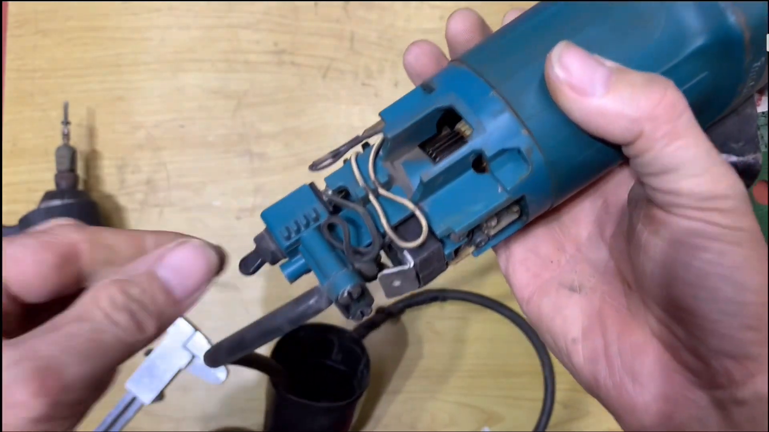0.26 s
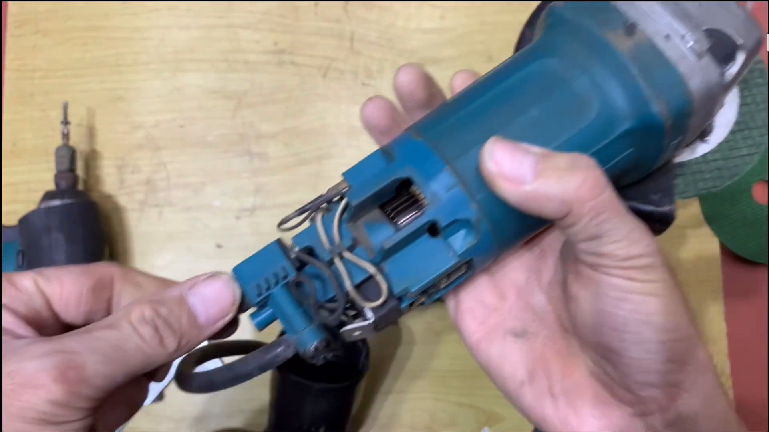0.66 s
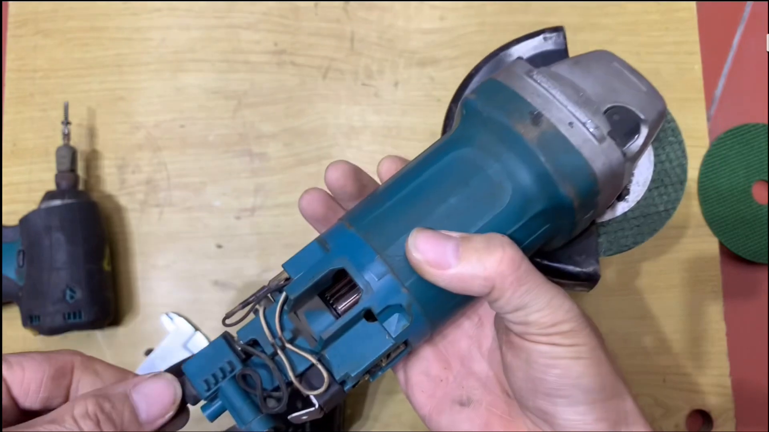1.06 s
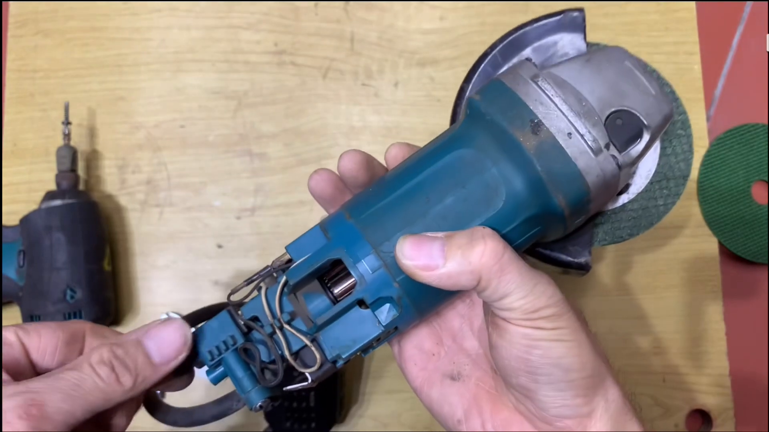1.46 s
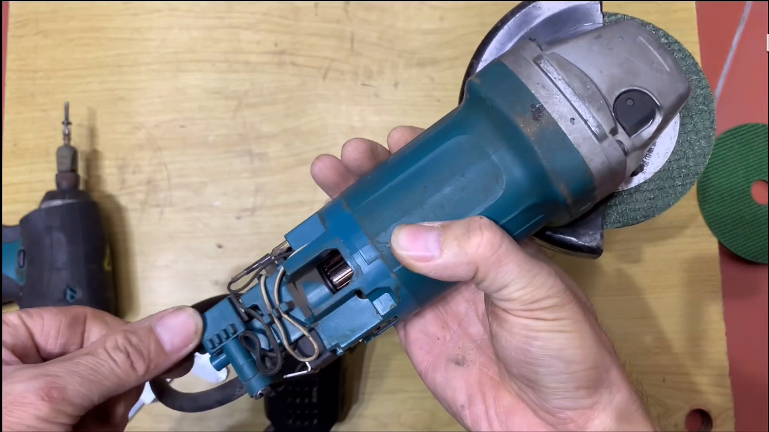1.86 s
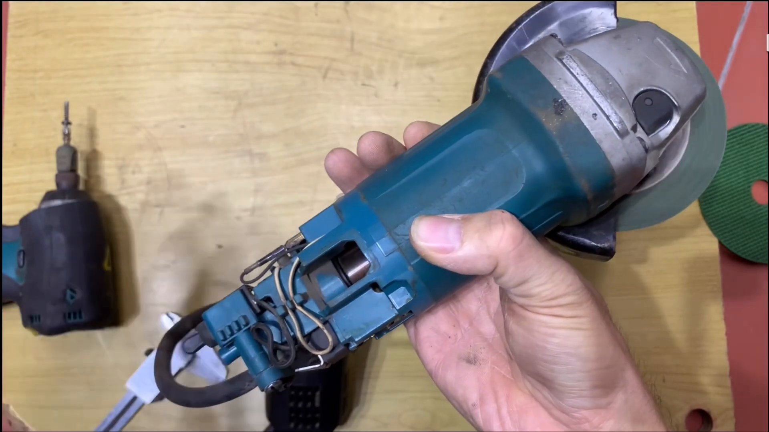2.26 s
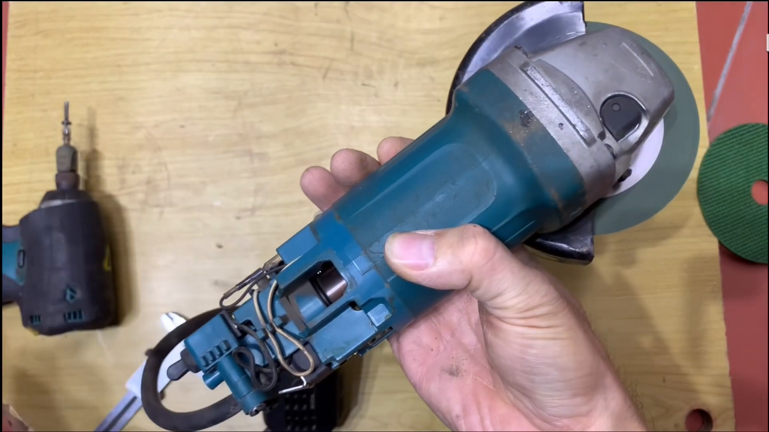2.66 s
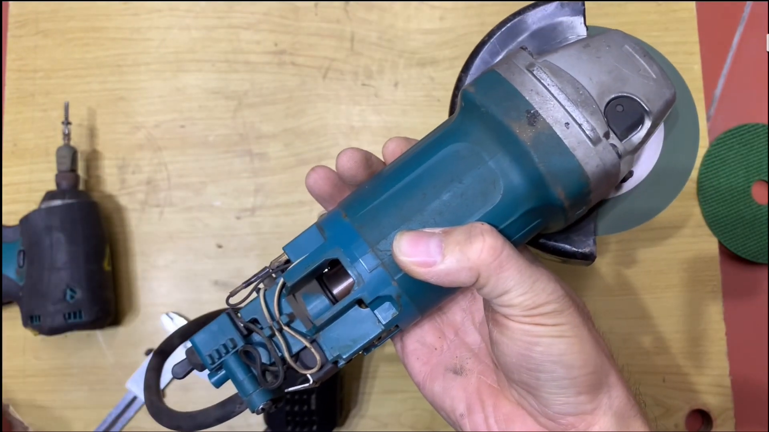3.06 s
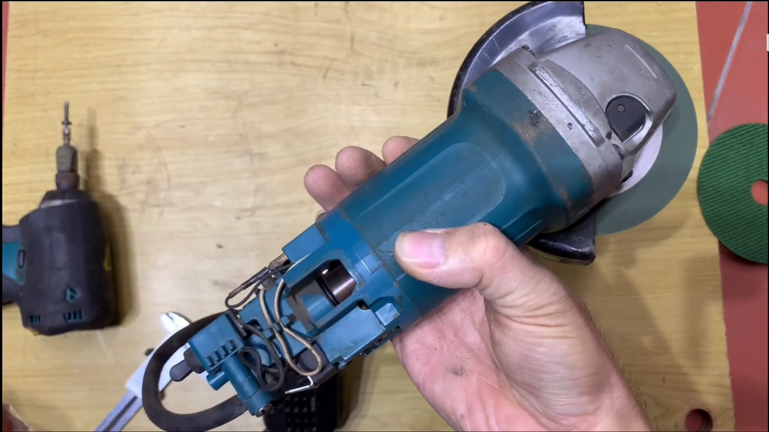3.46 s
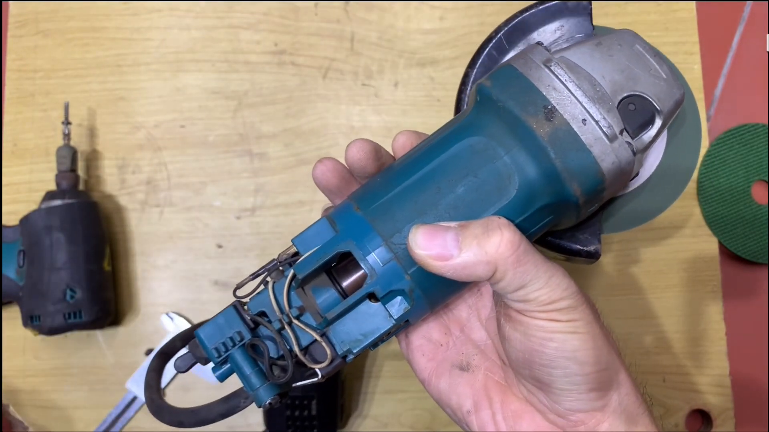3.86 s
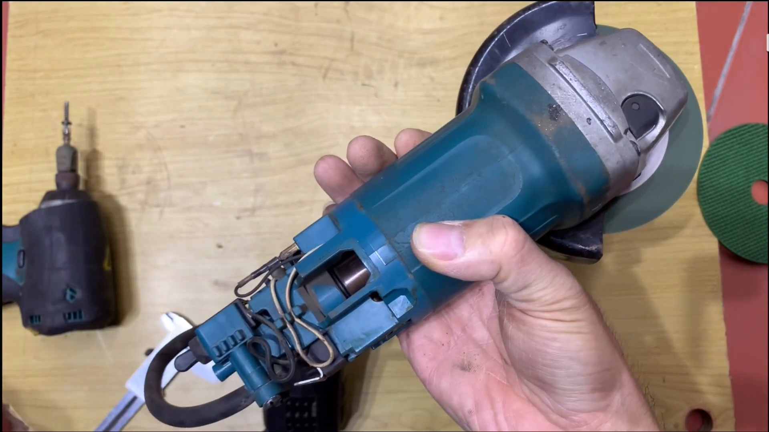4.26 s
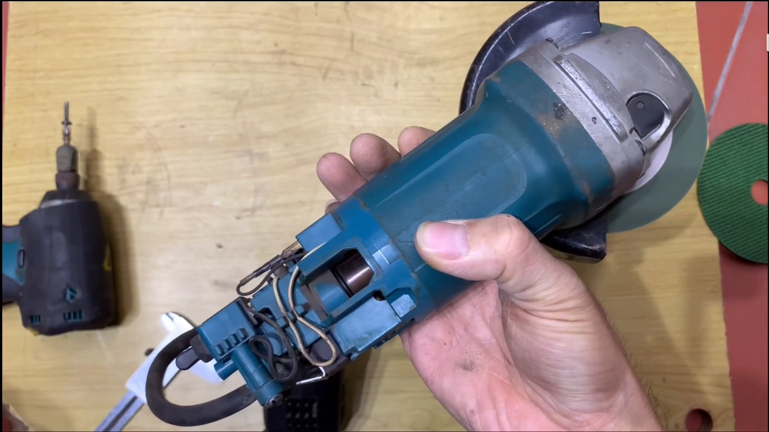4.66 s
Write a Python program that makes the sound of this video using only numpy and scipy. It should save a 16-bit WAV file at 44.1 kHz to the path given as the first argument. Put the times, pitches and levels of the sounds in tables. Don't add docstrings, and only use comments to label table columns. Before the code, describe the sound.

A small workshop, heard close up by one microphone. For the first 1.5 seconds there is only low room hum and drone, a fading outside wash, soft sleeve brushes, dull finger taps around 0.2 and 0.4, very faint distant metal squeaks, and light high ticks around 1.2 to 1.4. At 1.59 the switch snaps: a sharp, bright click with tiny bounces and a short room echo. Near 1.88 the motor gets its first current: a couple of metallic gear ticks, then faint, irregular knocks that crowd together and grow louder from 2.1 to 2.5. They become a harsh, regular buzzing rattle, hardest around 2.8 to 3.0, as the motor tones sweep upward. After 3.3 the knocks fade into smoother whirring. Fan roar and piercing high whine take over, still climbing ever more slowly, nearly steady and loud by about 4.5 to the end.

```python
import sys
import numpy as np
from scipy import signal
from scipy.io import wavfile
from scipy.ndimage import uniform_filter1d

SR = 44100
rng = np.random.default_rng(int(sys.argv[2]) if len(sys.argv) > 2 else 0)


def wrap_up_sound(samples):
    columns = np.atleast_2d(samples).T
    tamed = np.clip(columns, -1, 1)
    steps = np.round(tamed * 32767).astype(np.int16)
    wavfile.write(sys.argv[1], SR, steps)


def convert_level_to_amplitude(level_db):
    exponent = np.asarray(level_db, float) / 20
    return 10 ** exponent


N = 212076
T = np.arange(N) / SR

MAINS_PULSES = 100
START_S = 1.88
RAMP_S = 2.5

# time in seconds, peak in dB, strongest mode in Hz.
FIRST_KNOCKS = [(1.8843, -15.5, 3130), (1.8906, -18.5, 3140), (1.9305, -23.5, 3300), (2.0, -32.5, 2350),
                (2.0102, -33, 1890), (2.0526, -28.5, 3100), (2.0687, -26, 3190), (2.0888, -28, 3200),
                (2.1006, -26, 3200), (2.1406, -21.5, 3140), (2.162, -25.5, 3210), (2.2196, -21, 3150),
                (2.2318, -26, 3100), (2.2387, -18.5, 3190), (2.2484, -23, 3060), (2.2617, -19, 3080),
                (2.2688, -22, 3140), (2.2975, -19.5, 3400), (2.314, -21, 3294), (2.329, -14.5, 3100),
                (2.3602, -12.5, 3230), (2.3683, -18, 4800), (2.399, -12.5, 3130), (2.4098, -13, 3210),
                (2.4192, -10.5, 2010), (2.4481, -12.5, 3170), (2.46, -12.5, 2990), (2.4807, -12, 3170),
                (2.5, -12, 3220)]
# frequency in Hz, level in dB per Hz.
GEAR_COLOUR = [(180, -36), (300, -5), (808, -33), (1030, -1), (1260, -11), (1490, -2.5), (1730, -3.5),
               (3230, 2), (3940, -7.5), (4800, -2.5), (5760, -8.5), (9290, -10.5), (11900, -24.5),
               (14300, -12.5), (15500, -14)]
# time in seconds, peak in dB.
SNAP = [
    (1.5897, -40),
    (1.5916, -24),
    (1.5921, -11.5),
    (1.5931, -18),
    (1.5945, -22),
]


def evened(x):
    return x / np.sqrt(np.mean(x ** 2) + 1e-20)


def read(points, hz):
    f, value = np.transpose(points)
    return np.interp(np.log(np.minimum(hz, 15500) + 1), np.log(f + 1), value)


def add(mix, s, sound):
    part = mix[round(s * SR):][:len(sound)]
    part += sound[:len(part)]


def noise(field_db, patchy_db, size=512):
    frames, hz = 4 * N // size + 5, np.fft.rfftfreq(size, 1 / SR)
    a, b, patches = rng.standard_normal((frames, len(hz), 3)).T
    patches = uniform_filter1d(patches, size=6, axis=0)
    patches = evened(uniform_filter1d(patches, size=20, axis=1))
    field = field_db(hz[:, None], np.arange(frames) * size / 4 / SR) + patchy_db * patches
    return signal.istft((a + 1j * b) * convert_level_to_amplitude(field), nperseg=size, noverlap=3 * size // 4)[1][:N]


def steady(colour_db, patchy_db, size=256):
    return evened(noise(lambda hz, t: colour_db(hz) + 0 * t, patchy_db, size=size))


def band(hz, centre_hz, width_hz):
    return 1 / (1 + (2 * (hz - centre_hz) / width_hz) ** 2)


def resonate(x, hz, width_hz):
    r = np.exp(-np.pi * width_hz / SR)
    return 2 * signal.lfilter([1 - r], [1, -r * np.exp(2j * np.pi * hz / SR)], x).real


def struck(modes, crack, crack_db, crack_t60, spread_db=5.0, detune=0.014):
    t = np.arange(1300) / SR
    hz, db, t60 = np.transpose(modes)[:, :, None]
    draw = rng.standard_normal((len(modes), 3))
    late = np.maximum(t - 0.0002994 * abs(draw[:, 2:]), 0)
    level = convert_level_to_amplitude(db + spread_db * draw[:, :1] - 60 * late / t60)
    rings = level * np.sin(2 * np.pi * hz * (1 + detune * draw[:, 1:2]) * late)
    at = rng.integers(len(crack) - len(t))
    burst = crack[at:at + len(t)] * convert_level_to_amplitude(crack_db - 60 * t / crack_t60)
    sound = (rings.sum(0) + burst) * np.minimum(t / 0.00036, 1)
    return sound / abs(sound).max()


def workshop():
    # frequency in Hz, level in dB per Hz.
    air_colour = [(12, -15), (20, 5), (80, -16), (148, -10.5), (232, -17.5), (266, -21.5), (393, -33.5),
                  (465, -18), (649, -22.5), (958, -33), (1100, -32.5), (1300, -41.5), (15500, -50)]
    hum_db = -43 - 4.5 * np.clip((T - 1.27) / 0.089, 0, 1)
    wash_db = -54 - 5 * np.minimum(T, 1.8)
    air = steady(lambda hz: read(air_colour, hz), 0.87, size=2048)
    hum = steady(lambda hz: 20 * np.log10(band(hz, 143.4, 25) + 0.59 * band(hz, 119, 30)), 1.1, size=2048)
    drone = steady(lambda hz: 20 * np.log10(band(hz, 269.5, 56) + 0.78 * band(hz, 347, 84)), 0.75, size=2048)
    wash = steady(lambda hz: 20 * np.log10(band(hz, 900, 4000)), 1.5, size=512)
    return convert_level_to_amplitude(-43) * air + convert_level_to_amplitude(hum_db) * hum + convert_level_to_amplitude(-48.5) * drone + convert_level_to_amplitude(wash_db) * wash


def room(x):
    # frequency in Hz, t60 in seconds.
    walls = [(300, 0.52), (1000, 1), (3000, 0.47), (7000, 0.52), (14000, 0.18)]
    taps = np.zeros(SR // 2)
    at = np.arange(200, SR // 2 - 20, 20)
    taps[at + rng.integers(0, 20, len(at))] = rng.choice([-1., 1.], len(at))
    hz, t, z = signal.stft(taps, SR, nperseg=256)
    decay = convert_level_to_amplitude(-60 * t / read(walls, hz)[:, None])
    tail = signal.istft(z * decay * np.minimum(t / 0.024, 1), SR, nperseg=256)[1]
    return signal.fftconvolve(x, tail / np.linalg.norm(tail))[:N]


def handling():
    # centre in seconds, half length in seconds, level in dB.
    brushes = [
        (.09, .04, -54.5),
        (.8, .1, -68),
        (1.2, 0.099, -63.5),
    ]
    # centre in seconds, half length in seconds, level in dB.
    rubs = [
        (.22, .03, -58),
        (.41, .07, -59),
    ]
    # time in seconds, peak in dB, mode in Hz, treble in dB.
    touches = [
        (.21, -38, 2230, -9),
        (.38, -39, 2000, -9),
        (.39, -43, 3000, -13),
        (.54, -52, 3700, 1.5),
        (1.234, -38, 7100, 0),
        (1.337, -36, 11300, 0),
        (1.375, -42, 3800, 0),
        (1.567, -50, 5000, -6),
        (1.8785, -41, 3020, -2),
    ]
    # start in seconds, end in seconds, pitch in Hz, level in dB.
    squeaks = [
        (.3, .67, 3720, -67),
        (.38, .54, 1400, -73),
        (1.3, 1.33, 2610, -63),
        (1.338, 1.37, 2610, -63),
        (1.37, 1.52, 2610, -71),
    ]

    def strokes(rows):
        return sum(convert_level_to_amplitude(db - 10 * ((T - s) / half) ** 2) for s, half, db in rows)

    brush = steady(lambda hz: 10 * np.log10(band(hz, 5700, 9700)), 3.0)
    out = (convert_level_to_amplitude(-60.5 - 7 * T) + strokes(brushes)) * brush
    palm = steady(lambda hz: 20 * np.log10(band(hz, 2000, 2200)), 3.0)
    out += strokes(rubs) * palm
    for s, db, hz, treble_db in touches:
        modes = [(hz, -1.5, .008), (2.6 * hz, -4, .006)]
        add(out, s, convert_level_to_amplitude(db) * struck(modes, brush, treble_db, 0.015, detune=.02))
    for s, end, hz, db in squeaks:
        t = np.arange(s, end, 1 / SR)
        swell = signal.windows.tukey(len(t), .3) * convert_level_to_amplitude(4 - 9 * (t - s) / (end - s))
        add(out, s, convert_level_to_amplitude(db) * np.sqrt(2) * np.sin(2 * np.pi * hz * t) * swell)
    return out


def switch():
    # frequency in Hz, level in dB, t60 in seconds.
    switch_modes = [(497, -11.5, 0.046), (2320, -9.5, 0.011), (3420, -17, 0.0045), (5260, -1, 0.01),
                    (7600, 1, 0.0055), (9400, 2, 0.0065), (14870, -4, .004)]
    out = np.zeros(N)
    crack = steady(lambda hz: 20 * np.log10(band(hz, 12000, 14000)), .5)
    for s, db in SNAP:
        add(out, s, convert_level_to_amplitude(db) * struck(switch_modes, crack, 2.2, 0.0074, spread_db=3.0, detune=0.018))
    return out


def speed(t):
    top_hz, pull_s, lag_s, bend = 541.66, 2.57, .779, .902
    creep_hz_per_s = 158
    pull = top_hz * (1 - np.exp(-(np.maximum(t - pull_s, 0) / lag_s) ** bend))
    return np.maximum(pull, creep_hz_per_s * np.clip(t - START_S, 0, 1))


def firing(t):
    late = t - RAMP_S
    knock_ms = np.clip(9.3 - 5.6 * late, 2, 9.4)
    slot_ms = np.clip(11.18 - 9.9 * late, .3, 7.6)
    return knock_ms, slot_ms, np.clip(0.08 + 0.31 * late, .1, .8)


def current(ms, share):
    phase = 2 * np.pi * MAINS_PULSES * (T - ms / 1000)
    bump = np.exp((np.cos(phase) - 1) * 0.51 / np.clip(share, .1, 1) ** 2)
    return bump / np.sqrt(uniform_filter1d(bump ** 2, size=441))


def chatter():
    rise_s, jolt_db, jolt_s, settle_db_per_s = 0.99, 8, 0.036, 8
    ms, _, share = firing(T)
    since = np.maximum(T - START_S, 0)
    effort = np.sin(np.pi / 2 * np.minimum(since / rise_s, 1)) ** 2
    shared_db = jolt_db * np.exp(-since / jolt_s) - 25.0 * np.maximum(T - 3.9, 0)
    rattle_db = -57.5 + 38 * effort - settle_db_per_s * np.maximum(since - rise_s, 0)
    buzz_db = -50.5 + 15 * effort
    rattle = steady(lambda hz: read(GEAR_COLOUR, hz), 1.8)
    buzz = steady(lambda hz: 20 * np.log10(band(hz, 410, 1550) * hz ** 2 / (hz ** 2 + 400 ** 2) + 1e-5), 2.8)
    both = convert_level_to_amplitude(rattle_db) * rattle + convert_level_to_amplitude(buzz_db) * buzz
    return (since > 0) * convert_level_to_amplitude(shared_db) * both * (0.59 + 0.15 * current(ms + 1.45, share + 0.056))


def pulse_knocks():
    # time in seconds, extra level in dB.
    accents = [
        (2.55, 2),
        (2.66, 3),
        (2.68, 2.5),
        (2.76, 3.5),
        (2.78, 3),
        (2.8, 5),
        (2.81, 3.5),
        (2.93, 2),
        (2.98, 7),
        (3.04, 2),
    ]
    swell_db_per_s, peak_s, hold_s, ease_db_per_s, uneven_db = 10, 2.92, 3.28, 25, 1.8
    slots = np.arange(194, 390) / MAINS_PULSES
    draw = rng.standard_normal((len(slots), 3))
    s = slots + (firing(slots)[0] + .6 * draw[:, 0]) / 1000
    steady_db = -11.5 + swell_db_per_s * (np.minimum(s, peak_s) - RAMP_S)
    steady_db = steady_db - ease_db_per_s * np.maximum(s - hold_s, 0) + uneven_db * draw[:, 1]
    faint_db = np.minimum(-47 + 58 * (s - START_S), -27) + 1.9 * draw[:, 1]
    level_db = np.where(slots > RAMP_S, steady_db, faint_db)
    for when, extra_db in accents:
        nearest = abs(s - when).argmin()
        level_db[nearest] += extra_db - uneven_db * draw[nearest, 1]
    part_hz = rng.choice([2350, 2480, 3000, 2990, 3090, 3220, 4730, 4940], len(slots))
    part_hz = np.where((part_hz > 4000) & (slots > 2.85), 3250, part_hz)
    part_hz = np.where(slots > 3.1, 3200, part_hz)
    part_hz = np.where(slots > RAMP_S, part_hz, 3400) + 60 * draw[:, 2]
    free = abs(s[:, None] - np.transpose(FIRST_KNOCKS)[0]).min(1) > .006
    return np.transpose([s, level_db, part_hz])[free]


def knocks():
    # frequency in Hz, level in dB, t60 in seconds.
    gear_head = [(1070, -18, 0.066), (1466, -14.5, 0.063), (2295, -4.5, 0.014), (2964, -1.5, 0.014),
                 (3400, 1.5, 0.011), (4140, -12, 0.024), (4546, -10, 0.028), (4800, -7, 0.031),
                 (5380, -31, 0.03), (7100, -2, 0.015), (8800, -4.5, 0.014), (10480, -5.5, 0.019),
                 (15200, -24, 0.0072)]
    treble_hz = 5800
    thud = steady(lambda hz: read(GEAR_COLOUR, hz) - 30 * (hz > treble_hz), 0.28)
    tick = steady(lambda hz: read(GEAR_COLOUR, hz) - 30 * (hz < treble_hz), 0.54)
    out = np.zeros(N)
    for s, db, hz in [*FIRST_KNOCKS, *pulse_knocks()]:
        treble_db = -22 + .65 * (np.clip(db, -28, -9) + 25) + 2.5 * rng.standard_normal()
        modes = [(f, d + (treble_db + 6 if f > treble_hz else 0), t60) for f, d, t60 in gear_head]
        modes.append((hz, 7, .010))
        at = rng.integers(N - 2000)
        crack = thud[at:at + 2000] + convert_level_to_amplitude(treble_db + 8) * tick[at:at + 2000]
        add(out, s - .0003, convert_level_to_amplitude(db + 1.5) * struck(modes, crack, 0, .008, spread_db=2.5, detune=.025))
    return signal.sosfilt(signal.butter(2, 600, "high", fs=SR, output="sos"), out)


def tones():
    # multiple of the speed, pulsing with the current from 0 to 1,
    # then how loud the casing radiates it as pairs of frequency in Hz, level in dB rms.
    rotor_tones = [
        (1, 0, [(100, -58), (160, -52), (250, -46), (285, -41), (318, -32), (400, -31.5), (470, -26), (500, -25)]),
        (2, .05, [(400, -55), (700, -45), (770, -44), (820, -37), (880, -45), (950, -42), (1000, -31)]),
        (6, .2, [(1200, -60), (1900, -38), (2200, -31), (2500, -32), (2700, -35), (2850, -35), (3000, -34)]),
        (12, .95, [(1500, -50), (2300, -27), (3300, -22), (3900, -38), (4110, -24), (4700, -22), (5500, -30), (6000, -34)]),
        (24, .2, [(4000, -60), (8000, -50), (9800, -46), (10500, -38), (11000, -42), (11500, -33), (12000, -30)]),
        (31, .05, [(8000, -60), (12500, -40), (13000, -41), (13600, -46), (14100, -28), (14500, -25), (14800, -30), (15200, -40)]),
        (48, .5, [(9000, -60), (11500, -43), (13000, -41), (15000, -36), (15450, -37), (15500, -90)]),
    ]
    # frequency in Hz, width in Hz, level in dB.
    stator = [
        (2400, 200, -3),
        (3000, 160, 3),
        (4330, 170, 6),
    ]
    turning = uniform_filter1d(speed(T), size=2000)
    _, ms, share = firing(T)
    pulse, out = current(ms, share), np.zeros(N)

    def drift(v):
        return evened(uniform_filter1d(uniform_filter1d(v, size=500), size=500))

    for multiple, pulsing, radiated in rotor_tones:
        waver, swell = (drift(v) for v in rng.standard_normal((2, N)))
        turns = np.cumsum(multiple * turning * (1 + .0007 * waver)) / SR
        level = convert_level_to_amplitude(read(radiated, multiple * turning) + 0.58 * swell) * np.sqrt(2)
        out += level * (1 + pulsing * (pulse - 1)) * np.sin(2 * np.pi * turns)
    out += sum(convert_level_to_amplitude(db) * resonate(out, hz, width_hz) for hz, width_hz, db in stator)
    return out * np.clip((T - 2.4) / 0.28, 0, 1)


def roar():
    # frequency in Hz, level in dB per Hz.
    fan_colour = [(35, -79), (60, -47), (107, -34), (190, -34.5), (413, -18.5), (486, -19.5), (880, -18.5),
                  (2010, -9), (2980, -8.5), (3800, -13), (4400, -13.5), (7030, -9), (12300, -17.5),
                  (14500, -14.5), (15500, -21)]
    # frequency in Hz, width in Hz, level in dB.
    casing_modes = [(1100, 136, 4), (2060, 160, 0.5), (3080, 91, 2.5), (4850, 140, -5), (5420, 200, -45),
                    (7040, 1050, -1), (10860, 120, 1), (12800, 150, 0), (14700, 410, 7)]

    def field(hz, t):
        decades = np.log10(np.maximum(speed(t), 5) / 500)
        treble_db, low_db = np.maximum(21 * decades, -5.5), 2.5 - 10.5 * decades
        casing = 1 + 0.94 * sum(convert_level_to_amplitude(2 * db) * band(hz, f, w) for f, w, db in casing_modes)
        treble_tilt = treble_db * np.clip((hz - 9000) / 3000, 0, 1)
        low_tilt = low_db * np.clip((3000 - hz) / 1500, 0, 1)
        level_db = 24 * decades - 46 * decades ** 2
        return read(fan_colour, hz) + 10 * np.log10(casing) + treble_tilt + low_tilt + level_db

    air = noise(field, 0.99)
    return convert_level_to_amplitude(-11.5) * air / np.std(air[-SR // 3:])


def scene():
    hits, snap = knocks(), switch() + handling()
    click = np.zeros(N)
    add(click, SNAP[2][0], convert_level_to_amplitude(-8) * np.array([1, -.65]))
    echoes = convert_level_to_amplitude(-11.5) * room(hits) + room(convert_level_to_amplitude(-24) * snap + click)
    mix = hits + snap + echoes + tones() + chatter() + roar()
    motor_db = 10 * np.log10(uniform_filter1d(mix ** 2, size=8000) + 1e-9)
    duck_db = -.5 * np.maximum(motor_db + 21, 0)
    return np.tile(mix + convert_level_to_amplitude(duck_db) * workshop(), (2, 1))


def roll_off(x):
    return signal.sosfilt(signal.butter(12, 17030, fs=SR, output="sos"), x)


def record(dry):
    over = np.maximum(abs(dry) - .75, 0)
    limited = np.sign(dry) * (np.minimum(abs(dry), .75) + 0.24 * np.tanh(over / 0.27))
    edge = signal.firwin(601, 15770, window=("kaiser", 8), fs=SR)
    return roll_off(signal.oaconvolve(limited, edge[None], "same"))


dry = scene()
out = record(dry)
wrap_up_sound(out)
```